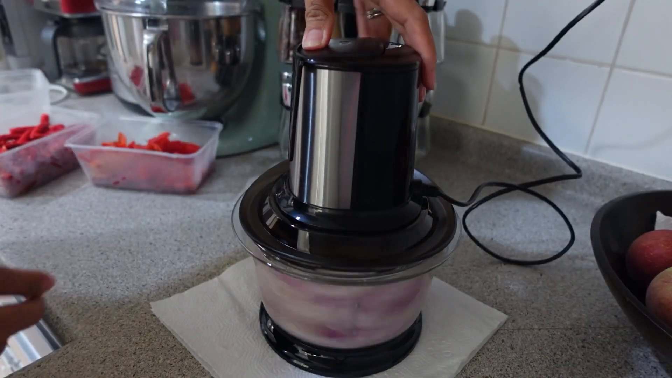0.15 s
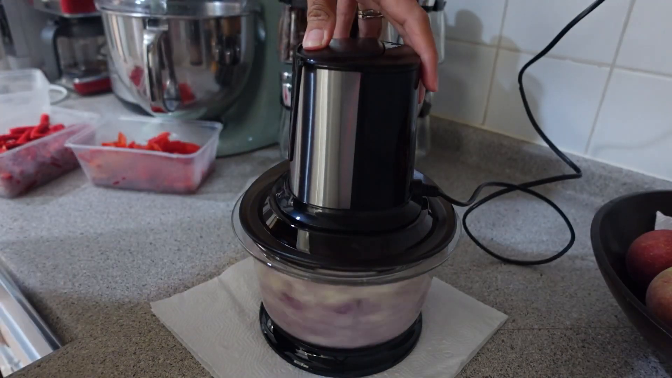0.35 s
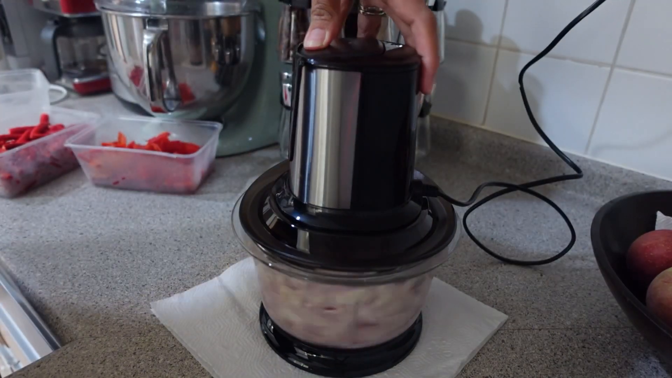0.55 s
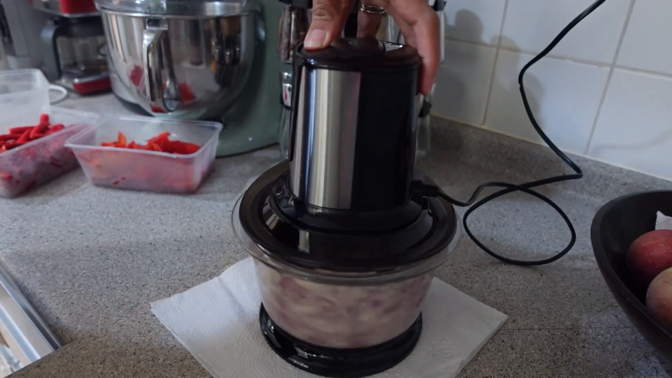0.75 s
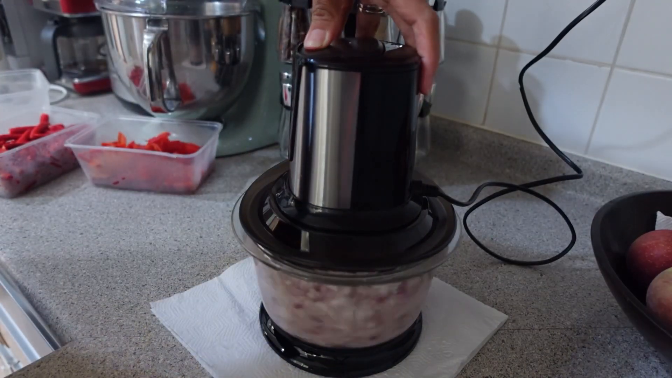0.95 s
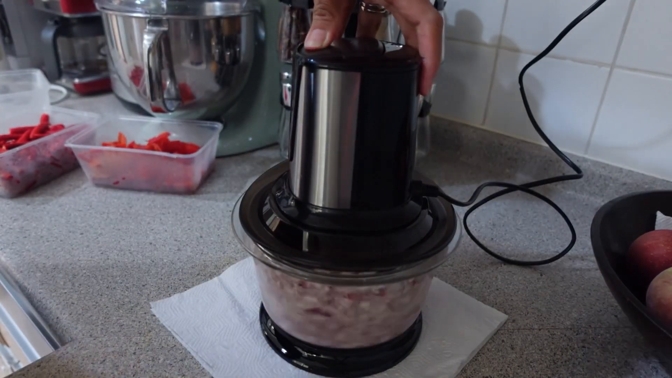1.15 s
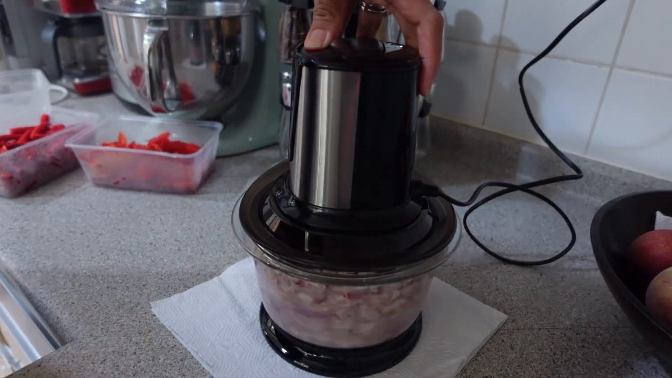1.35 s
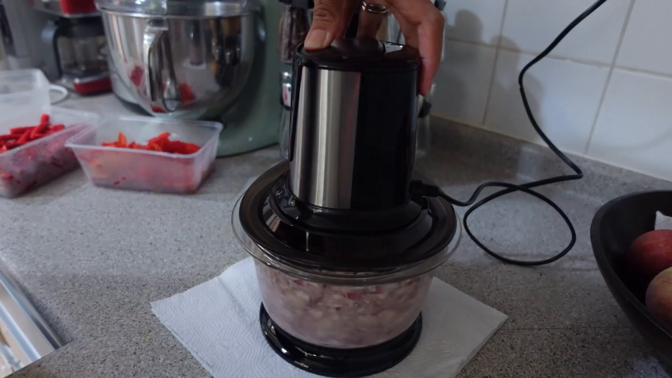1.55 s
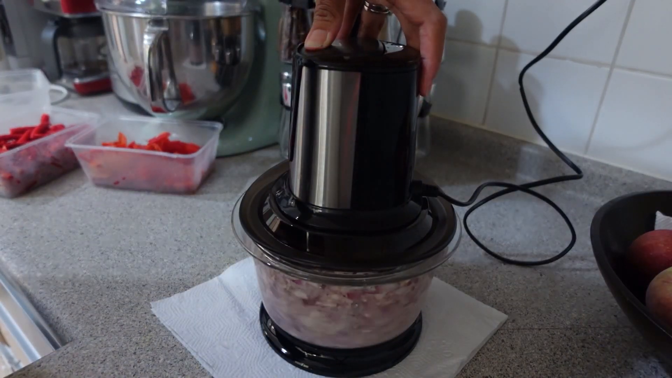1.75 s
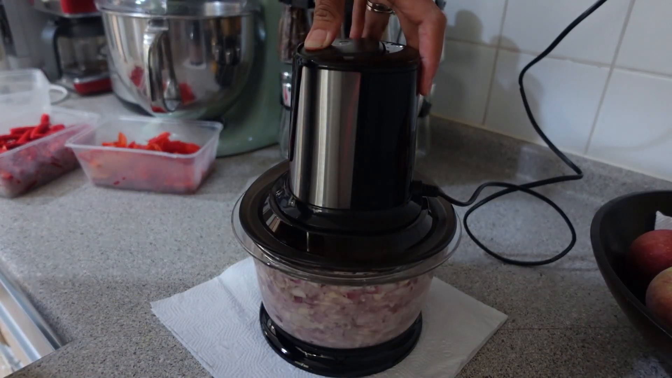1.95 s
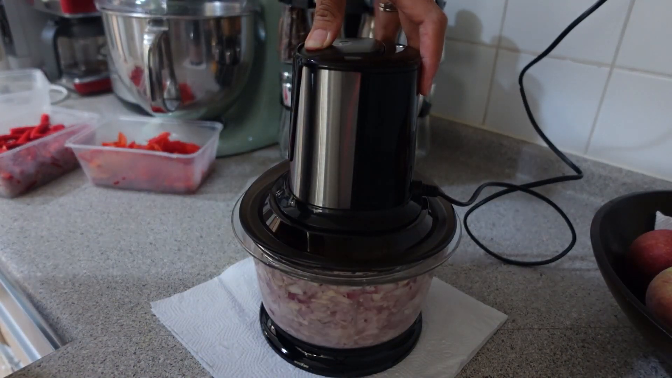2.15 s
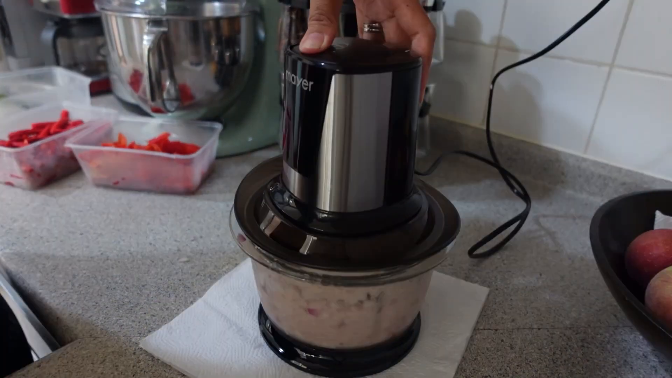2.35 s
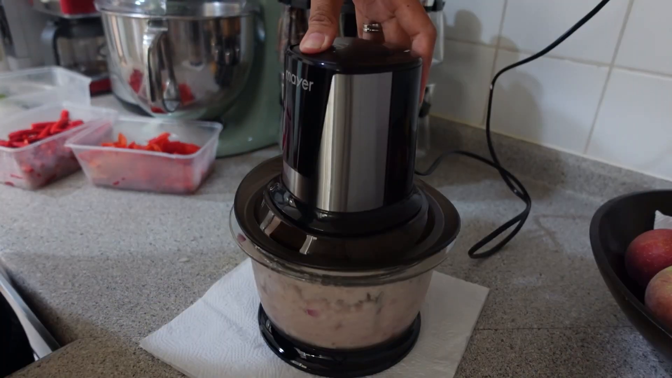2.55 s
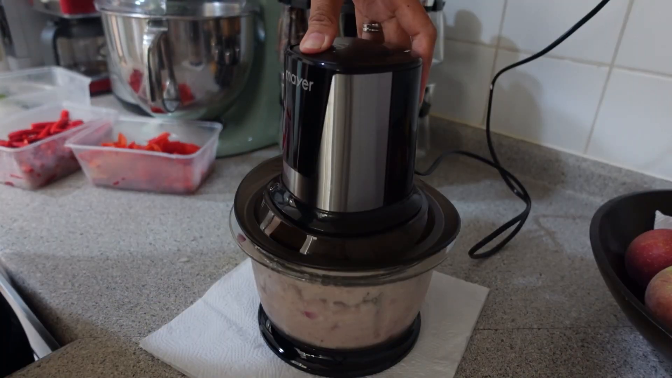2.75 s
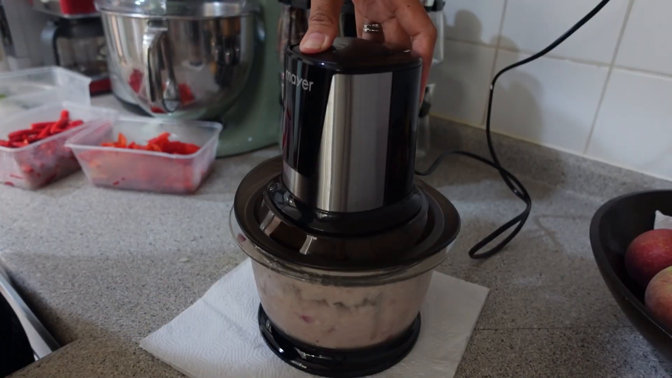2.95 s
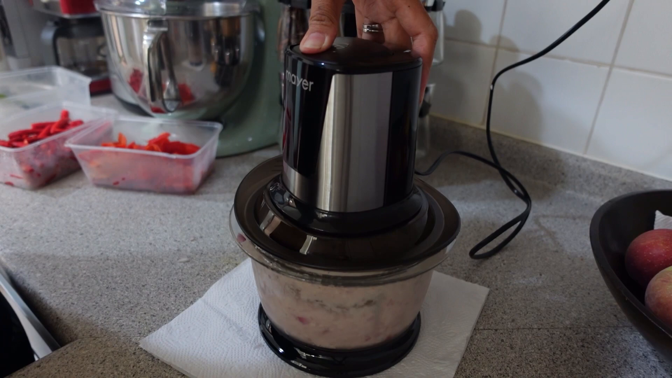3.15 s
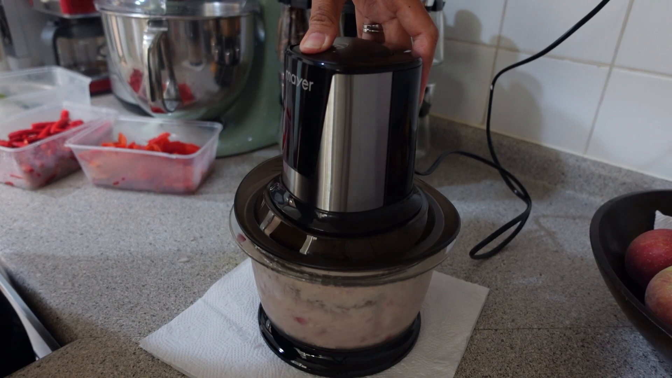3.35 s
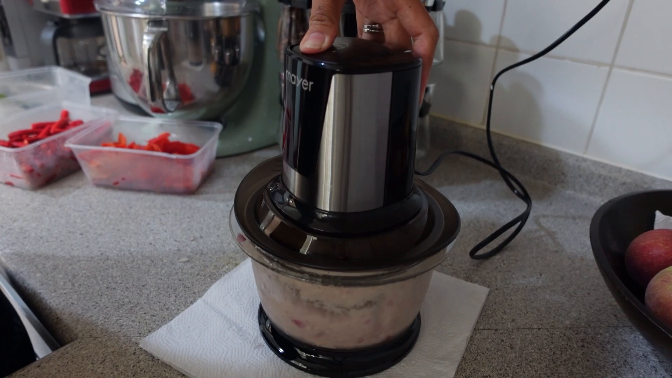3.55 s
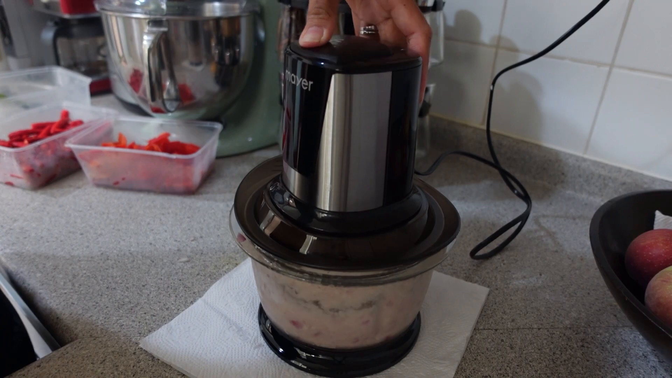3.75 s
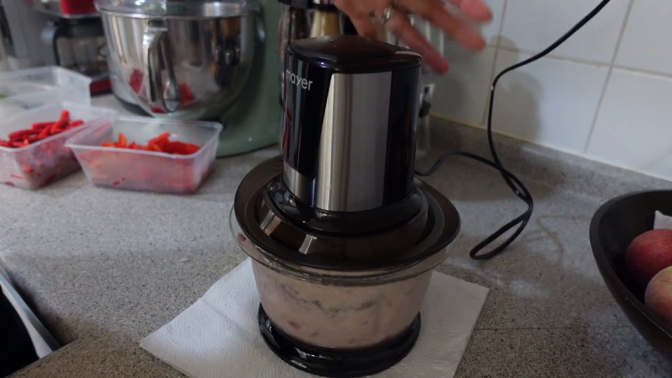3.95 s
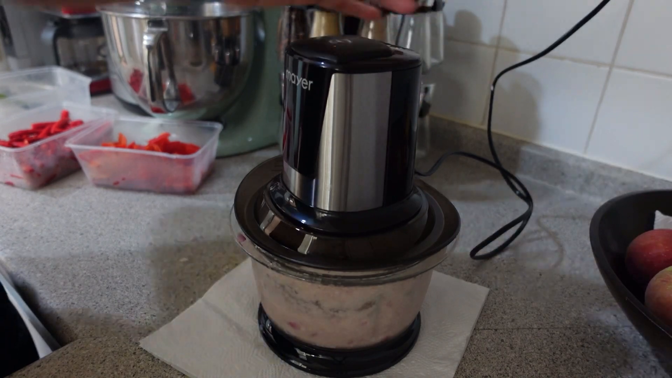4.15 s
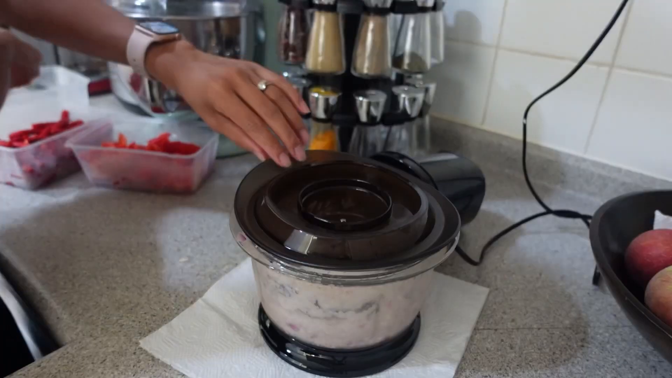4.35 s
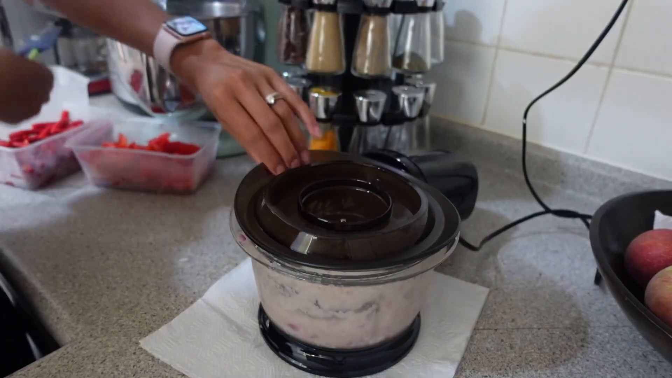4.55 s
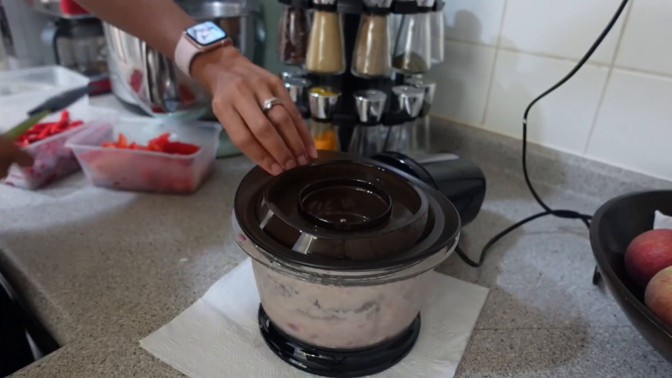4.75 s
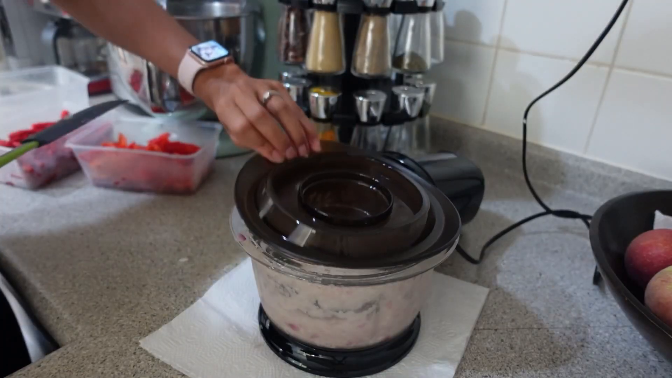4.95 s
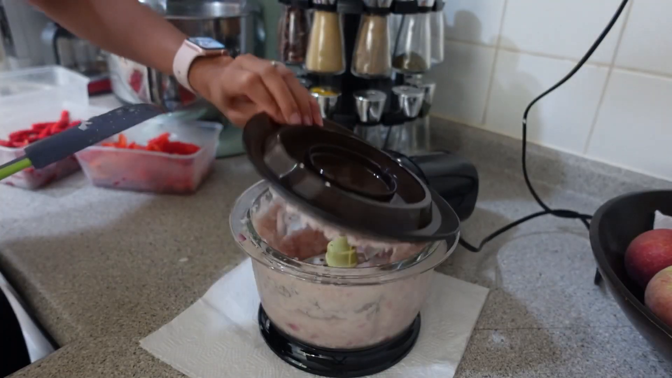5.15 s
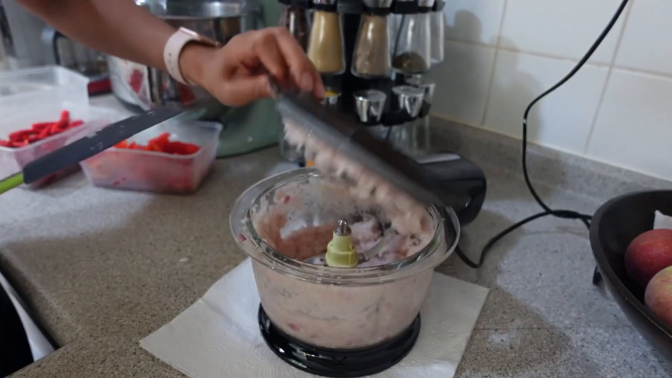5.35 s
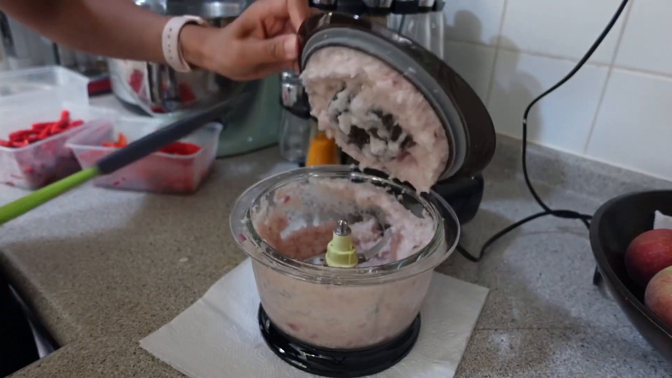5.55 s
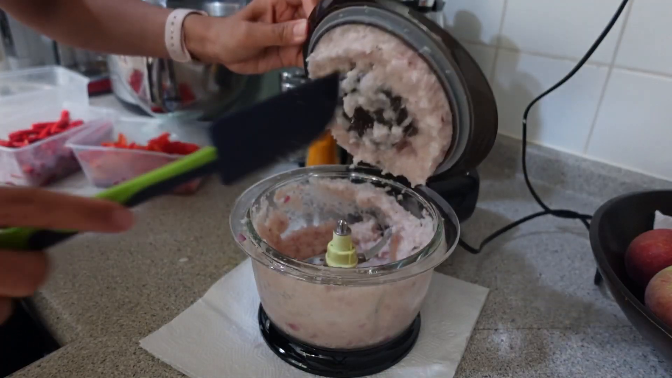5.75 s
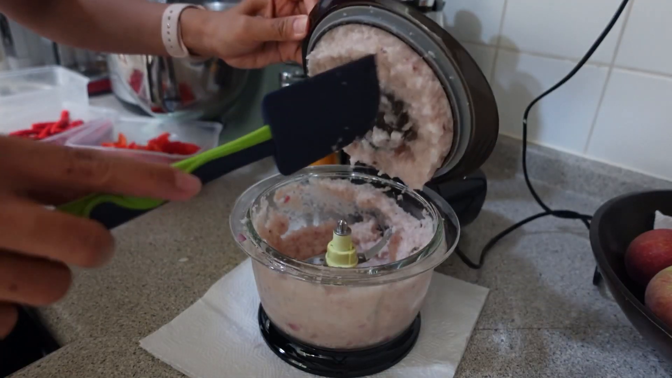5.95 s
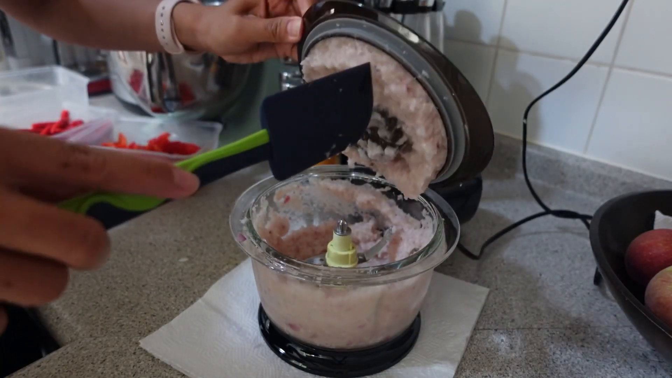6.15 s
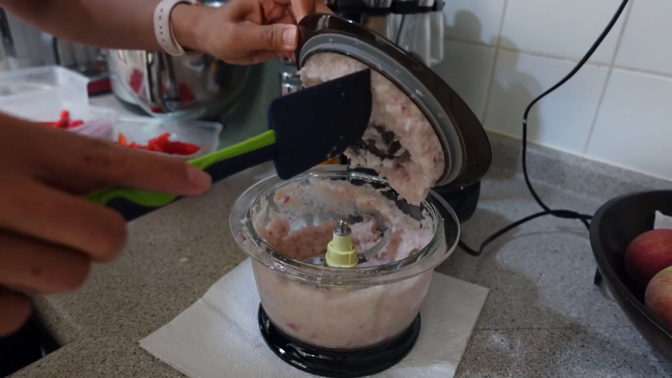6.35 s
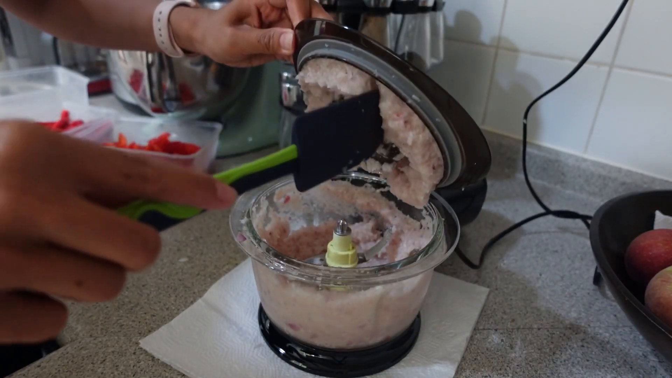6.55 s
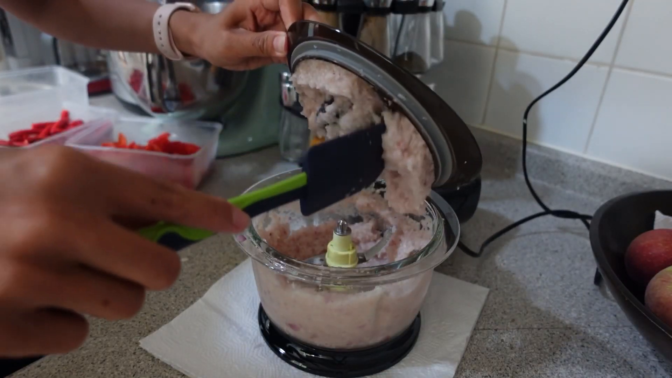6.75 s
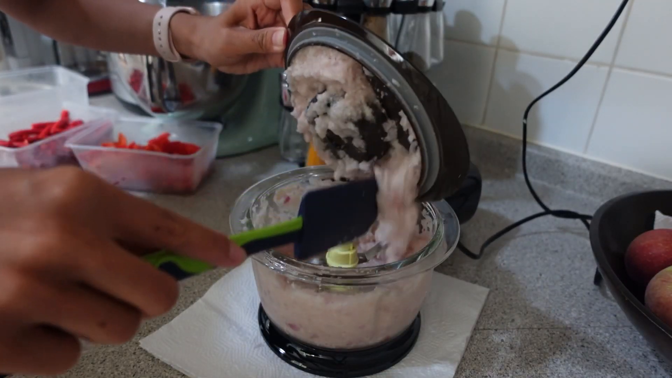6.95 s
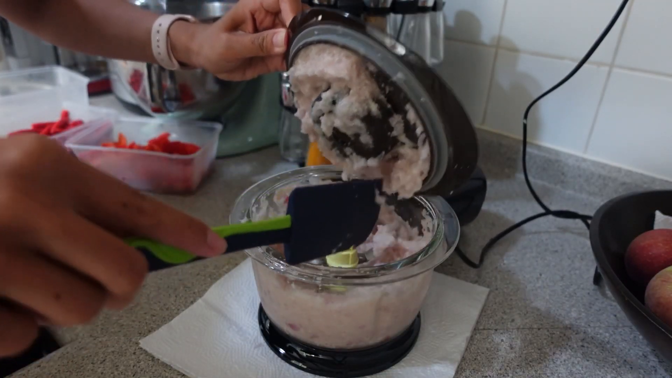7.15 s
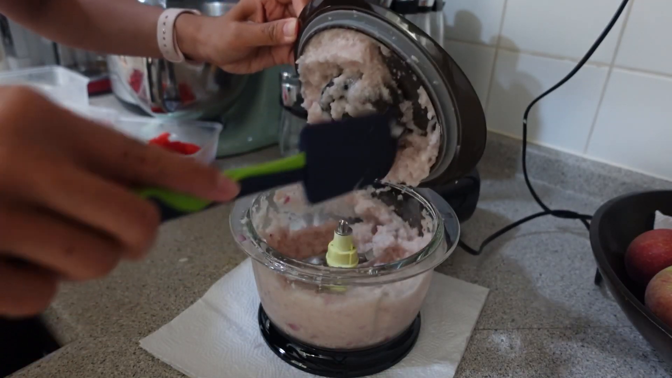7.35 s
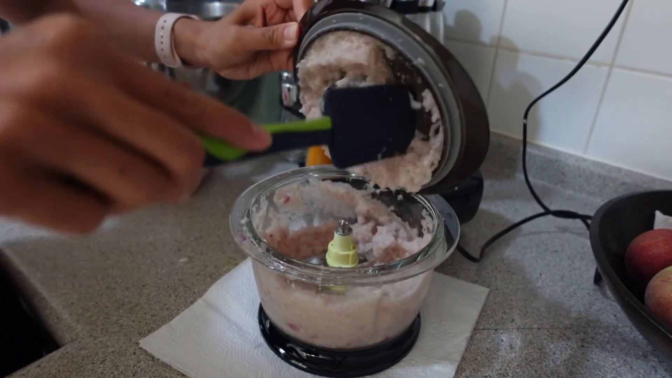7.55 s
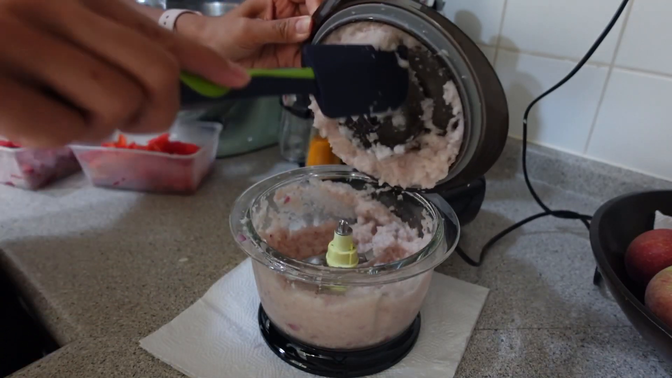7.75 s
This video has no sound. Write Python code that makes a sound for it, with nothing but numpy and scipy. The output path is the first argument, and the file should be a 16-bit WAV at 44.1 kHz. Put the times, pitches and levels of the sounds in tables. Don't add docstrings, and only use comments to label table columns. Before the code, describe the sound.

A small electric chopper roars and whines through wet food, rising in pitch, winds down, then quiet lid knocks and spatula scrapes over insect hiss.

```python
import sys
import numpy as np
from scipy import signal
from scipy.fft import rfft, irfft
from scipy.io import wavfile
from scipy.ndimage import uniform_filter1d

SR = 44100
rng = np.random.default_rng(int(sys.argv[2]) if len(sys.argv) > 2 else 0)


def invert_db(x):
    u = np.asarray(x, float) / 20
    return 10 ** u


def transcribe(u):
    v = np.clip(np.atleast_2d(u).T, -1, 1)
    q = np.round(v * 32767).astype(np.int16)
    wavfile.write(sys.argv[1], SR, q)


N = 343980
T = np.arange(N) / SR

# t/s, fade-in/s
CHANGES = [
    (2.2648, .024),
    (4.2318, .022),
]
FREE_S, COASTING_S, QUIET_S = CHANGES[0][0], 3.74, CHANGES[1][0]
# t/s, tooth rate f/Hz, whine level/dB
DRIVE = [(0, 1268, -27.5), (.13, 1281, -30.5), (0.171, 1300, -24), (.44, 1320, -22.5), (0.521, 1358, -22),
         (.78, 1390, -23), (1.08, 1475, -24), (1.22, 1487, -23), (1.32, 1532, -24.5), (1.6, 1525, -24),
         (1.75, 1601, -20.5), (1.8, 1574, -21.5), (1.941, 1576, -21.5), (2.06, 1633, -19.5),
         (2.26, 1713, -22), (2.27, 1760, -21.5), (3.001, 1756, -25.5), (3.64, 1776, -22.5)]
TEETH = 12
SWITCH_OFF_S, COAST_S = 3.64, 0.78
UNMESH_S, UNMESH_DB, UNMESH_WIDTH_S = 3.7, -5.5, 0.059
STALL_S, STALL_DROP_DB, STALL_DROP_S = 4.047, 3, 0.022
STALL_DB_PER_S, WHINE_STALL_DB_PER_S = 30.5, 143

# f/Hz, density level/dB
ROAR_LOADED = [(18, -60), (30, -52.5), (187, -3), (263, -22.5), (379, -19.5), (710, -14), (1370, -1.5),
               (1770, -3.5), (2250, -2), (2630, -10), (3590, -14.5), (5460, -15.5), (9460, -24.5),
               (14000, -28.5), (15600, -39.5)]
ROAR_FREE = [(18, -70.5), (30, -46.5), (169, -12.5), (308, -12), (410, -17), (710, -12), (1020, -8),
             (2130, -2.5), (2700, -8), (2990, -10), (3590, -16), (5320, -8.5), (6230, -15), (8090, -13),
             (15600, -33.5)]
ROAR_COASTING = [(18, -66), (30, -37.5), (100, -12), (400, -15), (547, -17.5), (592, -15), (899, -14.5),
                 (1640, -5), (2700, -15), (2990, -13.5), (4430, -14), (7280, -15.5), (15600, -41)]
# f/Hz, width/Hz, lift/dB in three stages
HOUSING_MODES = [(1034.4, 48, 9, 11, 7.5), (1167, 40, 7.5, 7, 9), (1353, 130, 7, 4, 2),
                 (1506, 18, 1.5, 4, 10.5), (1632, 32, 7, 6.5, 8), (1710, 30, -2.5, 3, 1),
                 (1957, 140, 4.5, 1.5, 7.5), (2090, 36, 2.5, 3, 8.5), (2235, 240, 6, 3.5, 4.5),
                 (3010, 50, 1.5, 5.5, 1.5), (3077, 260, 6.5, 3.5, 5.5), (3130, 60, 0.5, 3.5, 1.5),
                 (3220, 100, 0, -3, 0), (3500, 45, 0.5, 0.5, 3), (4570, 110, -0.5, -3, 0),
                 (3930, 130, 5, 5.5, 5.5), (4910, 82, 2.5, 1.5, 2.5), (5170, 32, 6.5, 4.5, 1),
                 (5495, 110, 7.5, 7.5, 4.5), (7120, 41, 12.5, 4, -0.5), (7260, 78, 10, -0.5, 4),
                 (7460, 75, 7, 3, 1.6), (8400, 42, 12, 7.5, 0), (9450, 170, 10, 1, 7.5),
                 (10350, 110, 9, 6, 5.5), (10900, 84, 4.5, 4, 4), (11500, 230, 5, 7, 6)]
ROAR_DB = [-11, -11, -12]
COUNTER_DB = [-12, -10.5, -10]
ROAR_SLOPE_DB = [-0.42, 1, 0]
RUMBLE_SLOPE_DB = [-1, -1.5, 1]
HISS_SLOPE_DB = [2, -1, 0.9]
BITE_DB, BITE_S = 2, 0.14
# t/s, length/s, strength level/dB
LUMPS = [
    (0.0, .05, 1.5),
    (0.402, 0.032, 4.5),
    (0.478, 0.042, 3.5),
    (2.14, 0.037, 5),
    (2.212, .05, 9.5),
    (2.4, .12, 2),
    (3.67, 0.067, -2.5),
    (3.801, .05, 3),
]
MUFFLE, SPLASH = 0.5, 0.96

# order, level/dB in three stages
SHAFT_ORDERS = [(1.01, -9.5, -9, -7.5), (2.003, -36.5, -2, -17), (5.07, -37.5, -23.5, -23.5),
                (10.13, -6, -31, -18.5), (10.76, 3.5, -17.5, -14.5), (11.87, 2.5, -31, -13.5),
                (13.1, -23, -15.5, -3.5), (20, -34.5, -2, -16), (21, -31.5, -12, -20),
                (22.45, -11.5, -33, -23.5), (24.1, -2.5, -17, -20.5), (34.96, -13.5, -18.5, -23.5),
                (36.53, -5, -14.5, -15), (37, -31.5, -6.5, -12.5), (47.86, -9.5, -14.5, -29.5),
                (49.93, -13, -29, -10.5), (48.7, -14, -30, -27.5), (61.5, -19, -30.5, -29),
                (60.3, -15, -35.5, -13.5), (72, -21.5, -23.5, -22.5)]
TIGHT_ORDERS = (11, 12, 20, 21, 24, 37)
# f/Hz, width/Hz, lift/dB
RADIATION_MODES = [(103, 20, 8.5), (612, 43, 28), (1410, 150, 7.5), (1490, 50, -6.5), (1531, 90, 9),
                   (1700, 100, 4.5), (2380, 260, 18), (2570, 82, 6.5), (2825, 220, -11.5), (2888, 90, 7.5),
                   (3064, 310, 10.5), (3387, 87, 7.5), (3900, 150, 2.5), (4300, 200, -2.5), (4420, 100, 1),
                   (4770, 120, -4.5), (4830, 120, 5), (5210, 200, 8), (5800, 420, 7), (7110, 90, 10),
                   (7420, 640, 10), (8000, 110, 6), (9480, 860, 12)]
SMOOTH_S, SIDE_FADE_DB_PER_S = 1.95, 64
WOBBLE_DB = 22
GEARBOX_HZ, GEARBOX_WIDTH_HZ, GEARBOX_DB = 1384, 27, 2
SINGS_S = 0.42
LOOSE_HZ, LOOSE_WIDTH_HZ = 1631, 35
LOOSE_S, LOOSE_DB, LOOSE_DB_PER_S = 3.96, -19, 32
# f/Hz, level/dB, t60/s
KNOCK_MODES = [(131.8, -14, 0.05), (197.4, 2.5, 0.26), (340, -1.0, 0.054), (650, -4.0, 0.02),
               (2100, -11.5, 0.008)]
# f/Hz, width/Hz, level/dB in three stages
HUM_MODES = [(99, 10, -35.5, -44.5, -35), (135.8, 20, -34.5, -37.5, -34), (191.6, 15, -28, -30, -40),
             (300.3, 9, -34.5, -38, -44.5), (363.4, 23, -33, -38.5, -47), (587, 48, -38, -36, -34.5)]

# t/s, peak level/dB, weight (0 light, 1 heavy)
BLOWS = [(4.2403, -19.5, 0.98), (4.246, -16, 0.85), (4.255, -23, 0.93), (4.263, -19, 0.84),
         (4.271, -22, .95), (6.954, -33, 0.27), (6.974, -36, 0.65), (6.994, -43, 0.8), (6.982, -31, 1),
         (7.013, -47, 0.81), (7.048, -47, 0.92), (7.073, -43, 0.94), (7.096, -50, 1), (7.5664, -23, 0.051),
         (7.5712, -30, 0.45), (7.5738, -30, 0.24)]
# f/Hz, level/dB, t60/s
RIM_MODES = [(470, -3, 0.067), (778, 3, 0.11), (1320, 12.5, 0.033), (1660, 2, 0.038), (2310, -21, 0.017),
             (2860, -3, .02), (3630, -30, .014)]
# f/Hz, level/dB, t60/s
BASE_MODES = [(330, -1, 0.06), (577, 4, 0.085), (826, -5, 0.054), (960, -1, 0.037), (1620, -9.5, 0.051),
              (2590, -6, .03)]
# t/s, peak level/dB, centre f/Hz, relative thump level/dB
TAPS = [(4.344, -34.5, 1500, -1), (4.358, -36.5, 1600, -7), (4.3854, -36, 1640, -4.5),
        (4.398, -39.5, 1500, -3.5), (4.422, -39.5, 1600, -9.5), (4.448, -38.5, 1700, -5),
        (4.855, -42.5, 1710, -25), (4.9136, -53, 1780, -13), (5.1905, -32.5, 1730, -7.5),
        (5.2594, -48.5, 1730, -10), (5.5748, -48, 1814, -21), (5.6262, -44, 5870, -20.5),
        (6.585, -41, 3420, -24), (6.926, -48, 2730, -4), (6.9456, -46, 2740, 2), (6.9531, -62, 3420, -14),
        (6.963, -50, 3890, 6), (6.9735, -34.5, 2400, -7), (6.9832, -44, 1662, -9), (7.125, -43, 1720, -19),
        (7.1557, -35, 3230, -24), (7.4056, -53, 1620, 4), (7.425, -39.5, 2500, -11),
        (7.4985, -54, 5210, -22), (7.567, -36, 2300, -23), (7.661, -38.5, 1623, -7)]
TAP_T60_S = 0.034
# peak t/s, peak level/dB, rise/s, fall/(dB/s), centre f/Hz
SLIDES = [(4.26, -42.5, 0.006, 48, 130), (4.355, -44, 0.017, 72, 1620), (4.72, -60, 0.055, 94, 200),
          (4.83, -51.5, .08, 93, 238), (5.001, -52.5, 0.018, 297, 280), (5.929, -65, .2, 75, 3470),
          (6.93, -48.5, .05, 89, 492), (6.95, -42, .04, 96, 119), (6.969, -46, 0.06, 300, 3530),
          (6.975, -57, 0.055, 200, 175), (7.06, -64, 0.052, 200, 100), (7.6, -46, 0.043, 159, 119)]

# f/Hz, density level/dB
ROOM_SPECTRUM = [(15, -41), (25, -20), (69, 0.5), (229, -0.5), (466, -8.5), (521, -6), (622, -7.5),
                 (907, -9.5), (1160, -8), (3510, -21.5), (5000, -26), (6500, -47), (11000, -120)]
ROOM_DB, SETTLE_DB, SETTLE_S = -51.3, 10.5, 0.25
HANDS_NEAR_S, HANDS_DB = 7.0, 1.5
# f/Hz, width/Hz, lift/dB
SHELL_MODES = [(1620, 220, 7), (2680, 200, 10), (954, 140, 4)]
# f/Hz, density level/dB
INSECT_SPECTRUM = [(2940, -70.5), (5000, -30.5), (5680, -28), (5960, -12.5), (6650, -8), (6780, -4.5),
                   (7170, -4.5), (7450, -3.5), (7630, -6.5), (8080, -2.5), (8670, -5.5), (9090, -8),
                   (9630, -17.5), (11900, -33.5), (15600, -35)]
INSECTS_DB = -39
# f/Hz, width/Hz, lift/dB
CHORUS_BANDS = [(7035, 63, 13), (7260, 35, 3), (7900, 80, 9.5), (8150, 31, 4), (8760, 40, -3),
                (9300, 120, 1.5), (10100, 50, 6)]
# f/Hz, level/dB
UNLIKE = [
    [(60, -18.5), (130, -24), (290, -10.5), (640, -9.5), (1410, -14.5), (3100, -19.5), (6820, -14.5),
     (15000, -26.5)],
    [(60, -22), (130, -4.5), (290, 1), (640, -2.5), (1410, -2), (3100, -3.5), (6820, -10.5), (15000, -40)],
]
# f/Hz, level difference/dB
BALANCE = [
    [(60, 1), (150, 1), (380, 0), (950, -1), (2380, -2), (5980, -0.54), (15000, 1.1)],
    [(60, 3), (180, 2), (550, 1.5), (1650, 0), (4970, 0.5), (15000, -1)],
]


def stage(t):
    return np.searchsorted([FREE_S, COASTING_S], t)


def motor(t):
    s, tooth_hz, whine_db = np.transpose(DRIVE)
    coast = np.exp(-np.maximum(t - SWITCH_OFF_S, 0) / COAST_S)
    unmeshed_db = UNMESH_DB * np.exp(-((t - UNMESH_S) / UNMESH_WIDTH_S) ** 2)
    stall_db = WHINE_STALL_DB_PER_S * np.maximum(t - STALL_S, 0)
    return np.interp(t, s, tooth_hz) * coast, np.interp(t, s, whine_db) + unmeshed_db - stall_db


def shaft_speed():
    return motor(T)[0] / TEETH * (1 + 0.00297 * drift(12))


def effort(t):
    now = stage(t)
    hz = motor(np.minimum(t, QUIET_S))[0]
    mean_hz = [hz[(now == k) & (t < QUIET_S)].mean() for k in range(3)]
    faster = 10 * (hz / np.take(mean_hz, now) - 1)
    lump_db = sum(db * np.exp(-(2 * (t - s) / length) ** 2) for s, length, db in LUMPS)
    late = np.maximum(t - STALL_S, 0)
    stall_db = STALL_DROP_DB * np.minimum(late / STALL_DROP_S, 1) + STALL_DB_PER_S * late
    roar_db = np.take(ROAR_DB, now) + np.take(ROAR_SLOPE_DB, now) * faster
    roar_db = roar_db + BITE_DB * np.exp(-t / BITE_S) - MUFFLE * lump_db - stall_db
    rumble_db = np.take(RUMBLE_SLOPE_DB, now) * faster + lump_db
    hiss_db = np.take(HISS_SLOPE_DB, now) * faster + SPLASH * lump_db
    return roar_db, rumble_db, hiss_db


def roar():
    def field(hz, t):
        level_db, rumble_db, hiss_db = effort(t)
        low = 1 / (1 + (hz / 600) ** 4)
        high = 1 / (1 + (3400 / (hz + 1)) ** 4)
        bodies = []
        for k, shape in enumerate((ROAR_LOADED, ROAR_FREE, ROAR_COASTING)):
            body_db = read(shape, hz) + lifts(HOUSING_MODES, hz, column=2 + k)
            bodies.append(unit(body_db, hz, 900, 2700))
        return np.hstack(bodies)[:, stage(t)] + level_db + low * rumble_db + high * hiss_db - 0.96
    return noise(field, patchy_db=1.2, flicker_db=0.35)


def rasp(shaft_hz):
    return 1 + 0.13 * np.cos(4 * np.pi * np.cumsum(shaft_hz) / SR) + 0.14 * drift(63)


def whine(shaft_hz):
    t = T[T < QUIET_S]
    slow = t[::32]
    shaft_hz = shaft_hz[:len(t)]
    turns, now = np.cumsum(shaft_hz) / SR, stage(slow)
    out = np.zeros(N)
    for order, *dbs in SHAFT_ORDERS:
        tight = round(order) in TIGHT_ORDERS
        order = round(order) if tight else order
        smear_hz = min(4.9 + 0.047 * order ** 2, 600)
        white = rng.standard_normal((2, len(slow)))
        shake = signal.lfilter(*signal.butter(2, smear_hz, fs=SR / 32), white)
        clean = np.clip(min(1.75 - order / 18, 0.12 + 0.42 * order), 0, 1)
        clean = max(clean, 0.92 * tight)
        radiated_db = lifts(RADIATION_MODES, order * shaft_hz[::32], column=2)
        gain = invert_db(np.take(dbs, now) + radiated_db - 6 + motor(slow)[1])
        if round(order) == 1:
            release = np.exp(-((slow - UNMESH_S) / UNMESH_WIDTH_S) ** 2)
            gain *= invert_db(WOBBLE_DB * release * (now == 1))
        if 0.5 < abs(order - TEETH) < 2:
            gain *= invert_db(-SIDE_FADE_DB_PER_S * np.maximum(slow - SMOOTH_S, 0) * (now == 0))
        in_phase = gain * (clean + (1.2 - clean) * evened(shake[0]))
        quadrature = gain * (1.2 - clean) * evened(shake[1])
        phase = 2 * np.pi * (order * turns + rng.random())
        out[:len(t)] += np.interp(t, slow, in_phase) * np.cos(phase)
        out[:len(t)] += np.interp(t, slow, quadrature) * np.sin(phase)
    return out


def gearbox():
    ring = resonant_noise(GEARBOX_HZ, GEARBOX_WIDTH_HZ)
    loose = resonant_noise(LOOSE_HZ, LOOSE_WIDTH_HZ)
    note = np.sqrt(2) * np.cos(2 * np.pi * np.cumsum(GEARBOX_HZ + 9 * drift(9)) / SR)
    sung = note * np.clip((T - SINGS_S) / 0.1, 0, 1)
    fade_db = SIDE_FADE_DB_PER_S * np.maximum(T - SMOOTH_S, 0)
    loaded = (0.6 * ring + 0.8 * sung) * invert_db(GEARBOX_DB + motor(T)[1] - fade_db)
    return loaded + loose * invert_db(LOOSE_DB - LOOSE_DB_PER_S * abs(T - LOOSE_S)) * (stage(T) == 2)


def chops():
    per_s = np.interp(T, [0, 2.2, 3.7, 4.1], [260, 45, 20, 3.9])
    strength = invert_db(4.5 * rng.exponential(1, N)) * rng.choice([-1, 1], N)
    hits = (rng.random(N) < per_s / SR) * strength
    knock = ringing(KNOCK_MODES, np.arange(2000) / SR)
    return invert_db(-41.5) * evened(signal.oaconvolve(hits, knock)[:N])


def hum():
    roar_db, rumble_db, _ = effort(T)
    now = stage(T)
    rings = sum(resonant_noise(hz, width) * invert_db(np.take(dbs, now)) for hz, width, *dbs in HUM_MODES)
    return rings * invert_db(2.0 * (roar_db + rumble_db + np.take(COUNTER_DB, now) + 21.0))


def contacts():
    out, t = np.zeros(N + SR), np.arange(SR // 4) / SR
    for s, db, hz, thump_db in TAPS:
        puff = rng.standard_normal((2, len(t))) * invert_db(-60 * t / TAP_T60_S)
        tick = band(puff[0], 0.7 * hz, min(2.5 * hz, 6600))
        thump = band(puff[1], 300, 1400)
        out[round(s * SR):][:len(t)] += invert_db(db) * (peaked(tick) + invert_db(thump_db + 8.5) * peaked(thump))
    rim, base = ringing(RIM_MODES, t), ringing(BASE_MODES, t)
    for s, db, weight in BLOWS:
        rattle = rng.standard_normal(len(t)) * invert_db(-60 * t / (0.006 + 0.012 * weight))
        rattle[0] += 6.0
        rung = signal.oaconvolve(rattle, (1 - weight) * rim + weight * base)[:len(t)]
        thud = band(rattle, 200, 3000 - 2200 * weight, order=4)
        out[round(s * SR):][:len(t)] += invert_db(db) * (peaked(rung) + invert_db(-8) * peaked(thud))
    return out[:N]


def slurry():
    grains, out = rng.standard_normal(N) * invert_db(2.0 * drift(48)), np.zeros(N)
    for s, db, rise, fall_db, hz in SLIDES:
        spread = 1.2 + 100 / hz
        wet = evened(band(grains, hz / spread, hz * spread))
        swell = np.clip(1 + (T - s) / rise, 0, 1) ** 2
        out += swell * invert_db(db - fall_db * np.maximum(T - s, 0)) * wet
    return out


def room_tone():
    def field(hz, t):
        after = np.maximum(t - QUIET_S, 0)
        level_db = ROOM_DB + SETTLE_DB * np.exp(-after / SETTLE_S) + HANDS_DB * (t > HANDS_NEAR_S)
        hum_db = unit(read(ROOM_SPECTRUM, hz), hz, 100, 2600) + level_db
        shell_db = 0.8 * read(ROAR_COASTING, hz) + lifts(SHELL_MODES, hz, column=2)
        wash_db = unit(shell_db, hz, 900, 2700) - 36.5 - (47.5 + 0.007 * hz) * after
        return 10 * np.log10(invert_db(2 * hum_db) + invert_db(2 * wash_db))
    return noise(field, patchy_db=2.5, flicker_db=0.1)


def insects():
    def field(hz, t):
        shape_db = read(INSECT_SPECTRUM, hz) + lifts(CHORUS_BANDS, hz, column=2)
        return unit(shape_db, hz, 5800, 10500) + INSECTS_DB + 0 * t
    return noise(field, patchy_db=0.5, flicker_db=0.25)


def kitchen(x, wet_db, t60):
    t = np.arange(SR // 2) / SR
    sparse = rng.choice([-1, 1], len(t)) * (rng.random(len(t)) < 0.06)
    echoes = sparse * invert_db(-60 * t / t60) * (t > 0.004)
    return x + invert_db(wet_db) * signal.oaconvolve(x, echoes / np.linalg.norm(echoes))[:N]


def ports(x, unlike, balance):
    t = np.arange(9000) / SR
    scatter = rng.standard_normal(len(t)) * invert_db(-60 * t / 0.25)
    scattered = signal.oaconvolve(x, scatter / np.linalg.norm(scatter))[:N]
    hz = np.fft.rfftfreq(N, 1 / SR)
    mid, side = rfft(x), invert_db(read(unlike, hz) - 6.5) * rfft(scattered)
    tilt_db = read(balance, hz) / 2
    return np.array([irfft((mid + way * side) * invert_db(way * tilt_db), N) for way in (1, -1)])


def noise(field_db, patchy_db, flicker_db):
    hz = np.fft.rfftfreq(1024, 1 / SR)[:, None]
    t = np.arange(N // 256 + 5) * 256 / SR
    a, b, patches = rng.standard_normal((len(t), 513, 3)).T
    patches = uniform_filter1d(patches, size=8, axis=0)
    patches = evened(uniform_filter1d(patches, size=12, axis=1))
    flicker = evened(uniform_filter1d(rng.standard_normal(len(t)), size=5))
    z = (a + 1j * b) * invert_db(field_db(hz, t) + patchy_db * patches + flicker_db * flicker)
    return signal.istft(z, nperseg=1024, noverlap=768)[1][:N] / np.sqrt(768)


def resonant_noise(hz, width_hz):
    return evened(signal.lfilter(*signal.iirpeak(hz, hz / width_hz, SR), rng.standard_normal(N)))


def drift(rate_hz):
    return evened(signal.lfilter(*signal.butter(2, rate_hz, fs=SR), rng.standard_normal(N)))


def ringing(modes, t):
    return sum(invert_db(db - 60 * t / t60) * np.sin(2 * np.pi * hz * t) for hz, db, t60 in modes)


def band(x, lo_hz, hi_hz, order=2):
    return signal.lfilter(*signal.butter(order, [lo_hz, hi_hz], "band", fs=SR), x)


def evened(x):
    return x / np.sqrt(np.mean(x ** 2) + 1e-20)


def peaked(x):
    return x / abs(x).max()


def read(points, hz):
    f, value = np.transpose(points)
    return np.interp(np.log(hz + 1), np.log(f + 1), value)


def lifts(modes, hz, column):
    return sum(m[column] / (1 + (2 * (hz - m[0]) / m[1]) ** 2) for m in modes)


def unit(shape_db, hz, lo_hz, hi_hz):
    inside = (hz > lo_hz) * (hz < hi_hz)
    return shape_db - 10 * np.log10(np.sum(invert_db(2 * shape_db) * inside) / 513)


def scene():
    running = T < QUIET_S
    shaft_hz = shaft_speed()
    body = kitchen(roar() * rasp(shaft_hz) + chops(), -11.0, 0.26)
    chopper = body + whine(shaft_hz) + hum() + gearbox()
    before = ports(running * (chopper + insects()), UNLIKE[0], BALANCE[0])
    handling = kitchen(contacts() + slurry(), -7.5, 0.55)
    quiet = room_tone() + handling + kitchen(insects(), -5.5, 0.14)
    after = ports(~running * quiet, UNLIKE[1], BALANCE[1])
    return np.where(running, before, after)


def roll_off(x):
    return signal.sosfilt(signal.butter(12, 15700, fs=SR, output="sos"), x)


def record(dry):
    gain = np.ones(N)
    for s, fade in CHANGES:
        gain *= np.where(T < s, 1, np.clip((T - s) / fade, 0, 1))
    thin = signal.lfilter(*signal.butter(3, 50, "high", fs=SR), dry)
    ceiling = 1.08
    mix = ceiling * np.tanh(thin / ceiling) * gain
    return roll_off(mix)


dry = scene()
out = record(dry)
transcribe(out)
```